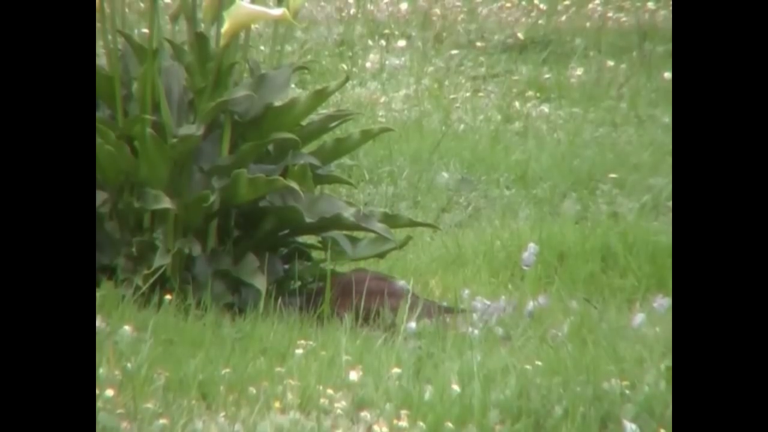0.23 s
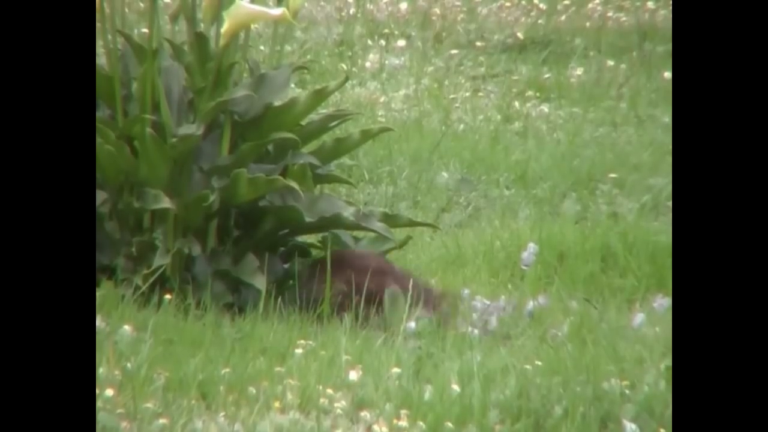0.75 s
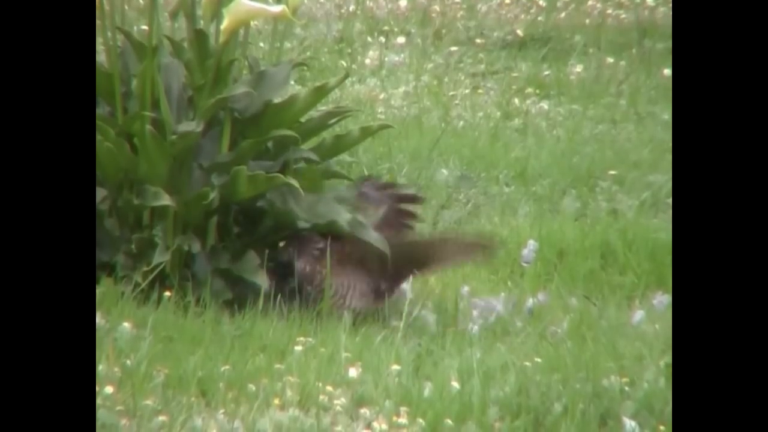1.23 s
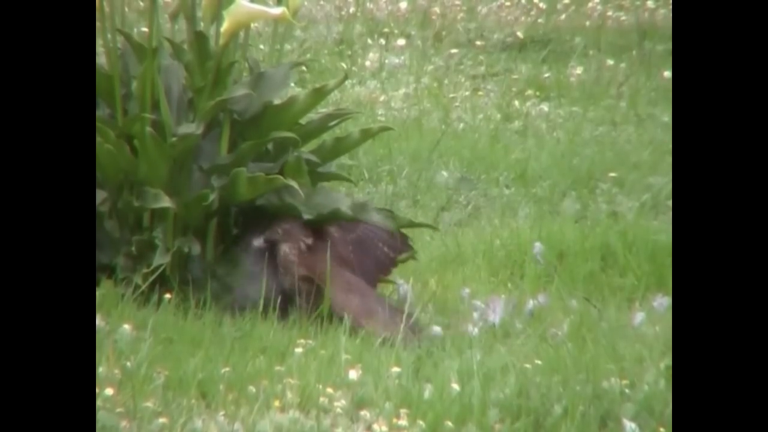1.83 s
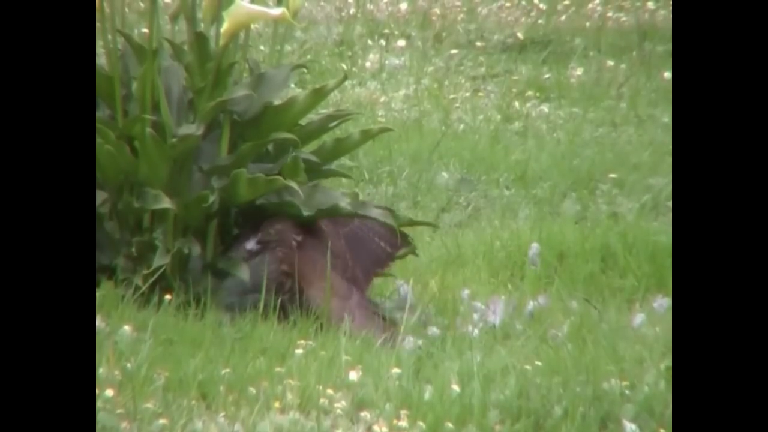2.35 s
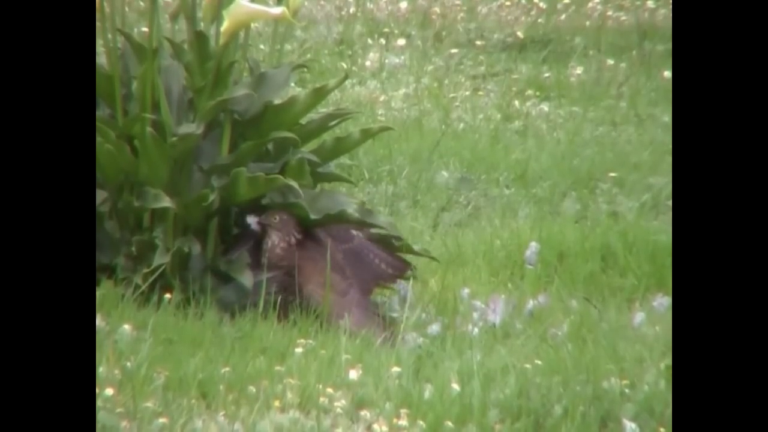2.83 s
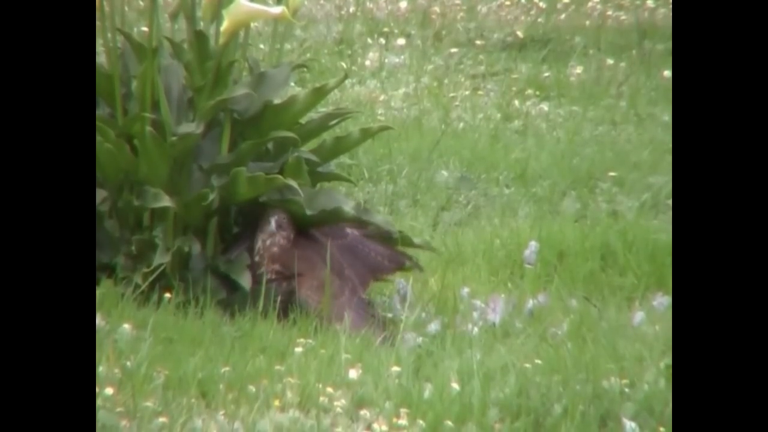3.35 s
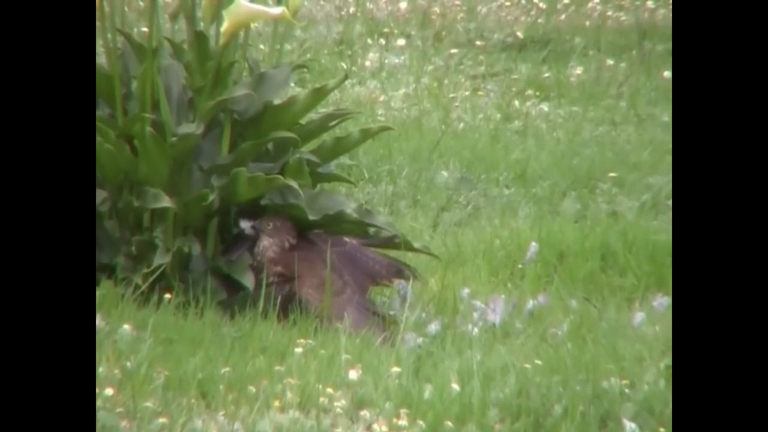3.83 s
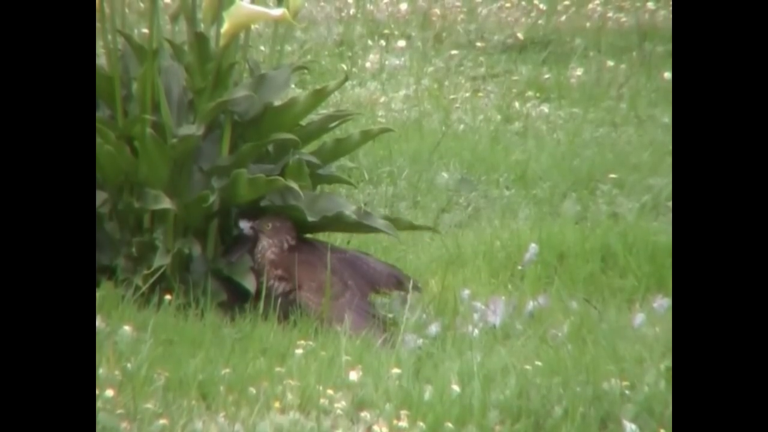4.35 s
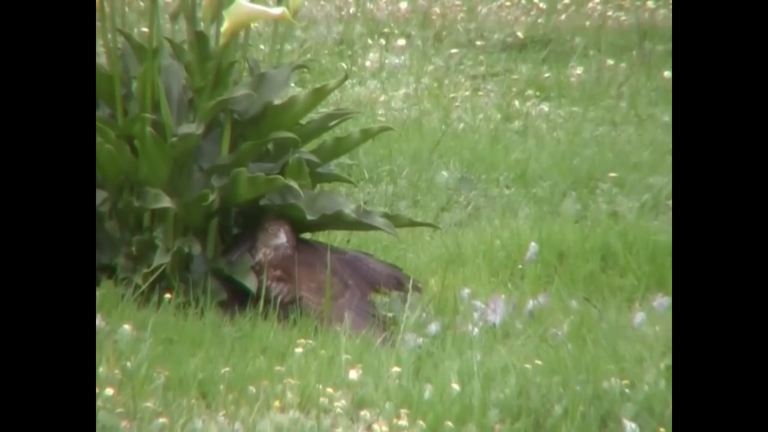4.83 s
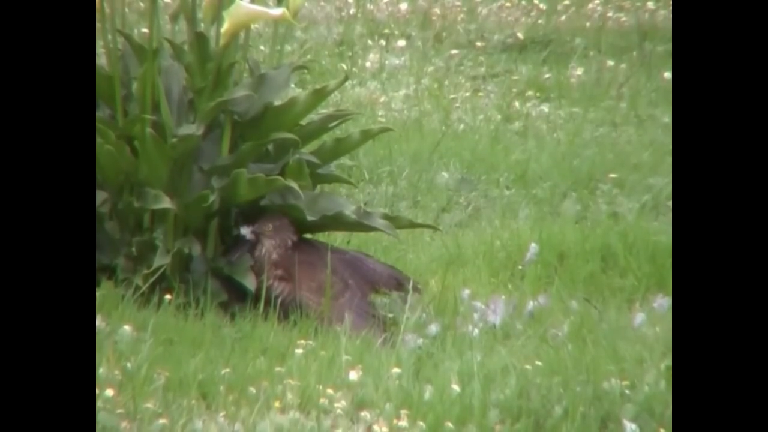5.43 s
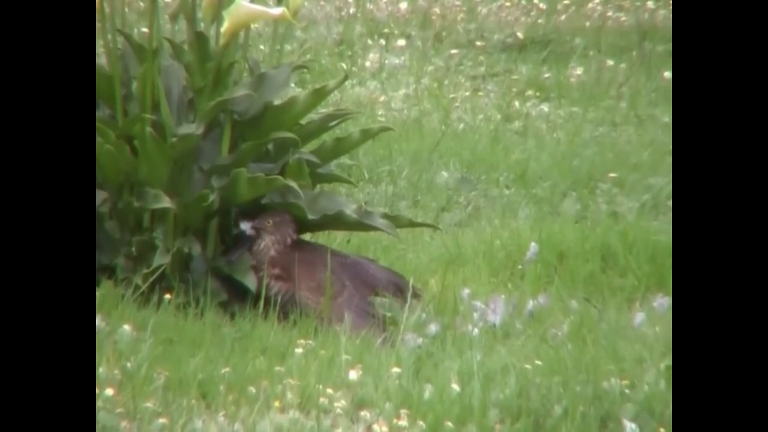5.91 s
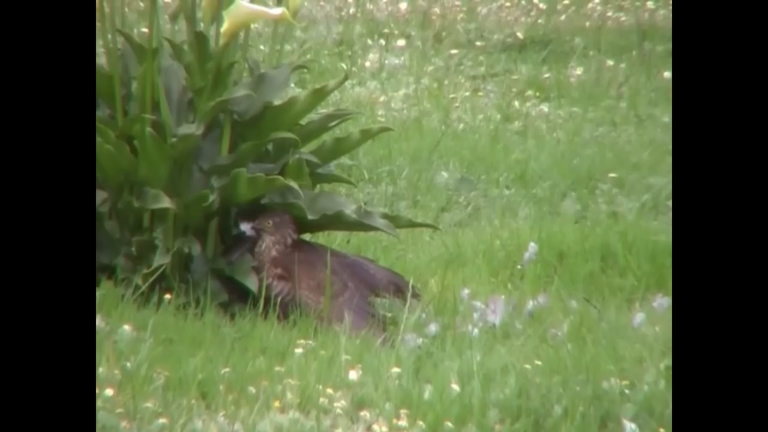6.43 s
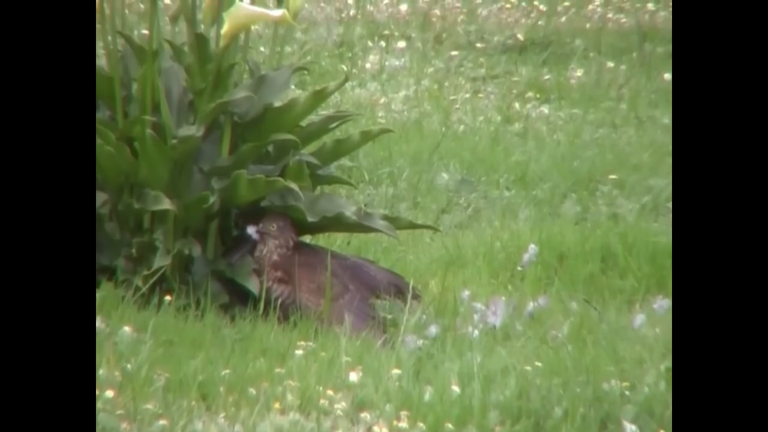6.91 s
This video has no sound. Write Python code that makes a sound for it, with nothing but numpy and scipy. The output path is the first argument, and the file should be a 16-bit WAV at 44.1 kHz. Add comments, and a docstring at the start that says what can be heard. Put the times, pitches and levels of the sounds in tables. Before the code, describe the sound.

Outdoors on a quiet lawn, a few dry stem snaps and faint distant bird whistles come first. Wing strokes then thump and scrape through rustling leaves and dry grass. A bird squeals shrilly, breaking into hoarse screeches with low squawks beneath. A sudden hard burst of flapping and cracking follows, then a few weaker cries. Close stereo microphones, light garden echo.

```python
"""On a lawn, close to a leafy plant, a hawk holds a pigeon down; small birds whistle and coo far off.
Stems snap first, then wing strokes push air and scrape feathers while leaves and dry grass rustle.
From 3.4 s a bird squeals and squawks: pairs of syrinx notes, each an arch of pitch, level and roughness.
A hard burst of flaps follows at 5.6 s, then a few last cries. Garden echoes and a short tail answer,
over faint wide air; two close microphones hear the bass alike."""
import sys
import numpy as np
from scipy import signal
from scipy.fft import rfft, irfft
from scipy.io import wavfile

SR = 44100
rng = np.random.default_rng(int(sys.argv[2]) if len(sys.argv) > 2 else 0)


def wav_out(sig):
    """Save sig, one row per channel (or a flat mono array), as 16-bit PCM at SR to the path in sys.argv[1]."""
    wavfile.write(sys.argv[1], SR, np.round(np.clip(np.atleast_2d(sig).T, -1, 1) * 32767).astype(np.int16))


N = 316638
TIME = np.arange(N) / SR

# Whistled notes; the two sides of the syrinx may overlap: (crest time [s], swell [s], fade [s],
# crest pitch [Hz], start and end against the crest [semitones], relative level [dB],
# roughness [0-1], second harmonic before the throat's colour [dB])
SQUEAL_NOTES = [ (3.407, 0.02, .026, 2724, -0.5, -1.5, -20, 0.35, -4.5),
                (3.458, .032, 0.048, 2906, -.3, -7, -16.5, 0.14, -5),
                (3.436, 0.017, .024, 3660, -3.5, 1.5, -21, 0.47, -11),
                (3.628, 0.012, 0.016, 2407, -1.4, 1, -25.5, 0.13, -11),
                (3.671, 0.029, 0.033, 3110, 3, 2, -25, 0.17, -3.5),
                (3.703, 0.027, .018, 4510, -0.5, 3.5, -38, 0.22, -15),
                (3.739, 0.029, 0.039, 3370, 0.5, -3.5, -28.5, 0.14, -4.5),
                (3.849, 0.014, 0.029, 2304, -0.6, 0.4, -31.5, 0.26, -18),
                (3.861, 0.028, 0.027, 3160, 1.3, 3, -29, 0.47, -26),
                (3.892, 0.021, 0.014, 3010, 3, 1.6, -24.5, .1, -17),
                (3.913, 0.023, 0.034, 4610, -0.2, -1, -36.5, 0.63, -28),
                (3.953, 0.041, 0.047, 3075, 2.2, -1.7, -31, 0.17, -10),
                (4.128, 0.045, 0.045, 2328, -0.3, 0, -27, 0.23, -5.5),
                (4.174, 0.019, 0.013, 2133, 1.5, -3, -26, 0.15, -4),
                (4.204, .042, .042, 4063, -2.2, -2, -18.5, .72, -15),
                (4.2256, 0.0092, 0.0072, 4010, .3, -.4, -6, 0.018, -17.5),
                (4.351, 0.015, .011, 3420, 0.6, 0, -20.5, 0.4, -5),
                (4.388, .04, 0.04, 4144, -.5, -2, -15.5, 0.81, -12.5),
                (4.433, 0.035, 0.045, 3580, -1, 0.2, -25, 0.44, -2),
                (4.749, 0.033, 0.019, 3386, -2, 4, -35.5, 0.85, -25),
                (4.772, 0.022, 0.015, 4590, 1, -3, -24.5, .15, -29),
                (4.785, 0.022, 0.021, 3724, 0.5, 0.7, -20.5, 0.1, -15),
                (4.815, 0.028, 0.027, 4510, 0.2, -1.5, -22.5, 0.096, -38),
                (4.828, 0.021, 0.056, 3814, -1, -2, -24, 0.2, -12),
                (5.015, 0.02, 0.02, 2990, 2, 2, -36.5, 0.06, -5),
                (5.03, 0.056, 0.045, 4610, -3.5, 1, -46.5, 0.13, -27),
                (5.115, 0.039, .03, 3566, 9, -7.5, -37.5, 0.17, -16),
                (5.357, 0.023, .058, 3205, .6, -0.1, -28, 0.38, -21),
                (5.474, 0.034, 0.051, 2370, 0.2, -1.4, -34.5, 0.25, -4.5),
                (5.524, .012, .014, 1914, .6, -1.5, -45, 0.23, -16),
                (5.581, .022, 0.027, 3370, -1, 4, -32, 0.47, -28),
                (5.59, 0.048, 0.033, 2378, -0.5, 0.5, -34, 0.46, -4),
                (6.706, 0.019, 0.038, 3670, -2, -3, -55, 0.17, -20),
                (6.684, 0.02, 0.084, 2386, -0.8, -3, -46, 0.14, -6),
                (6.797, 0.053, 0.037, 3390, 0.8, -1, -34, 0.098, -4),
                (6.823, .013, .036, 2586, 0.5, -1, -28.5, .07, -11.5),
                (6.875, 0.039, 0.047, 2358, 1.4, -4, -31, 0.22, -3.5),
                (7.043, 0.034, 0.019, 3060, 2, -1, -47.5, 0.13, -10.5)]
# Low-register notes: the same columns without the second harmonic
SQUAWK_NOTES = [ (3.843, 0.025, .012, 673, 0.6, -0.21, -34.5, 0.13),
                (4.2, 0.027, 0.029, 740, -0.5, -.6, -28, 0.51),
                (4.242, 0.015, 0.054, 739, 0.9, -1.49, -20, .18),
                (4.291, .018, .032, 593.5, 1.5, -.9, -19, .06),
                (4.385, .032, 0.034, 708, 0.5, 0.34, -28, 0.93),
                (4.444, 0.044, .046, 670.6, 0.6, -1.97, -26.5, 0.297),
                (4.872, .03, 0.0228, 475.6, 2.5, -0.91, -29, 0.91),
                (5.478, .03, 0.047, 1155, 1.9, -1, -46, 0.254),
                (6.707, 0.034, 0.05, 1190, -0.3, -1.6, -65, 0.13),
                (6.862, 0.046, 0.037, 1225, 0.4, -1.4, -33, 0.073)]
# Throat colour on the whistles' overtones: (frequency [Hz], level [dB])
OVERTONE_COLOUR = [(2000, -3), (5000, 2.5), (6500, -4), (8200, 5), (9800, 5.5), (11500, -2.5), (13000, 4)]
# Throat colour on the squawks: (frequency [Hz], level [dB])
THROAT_COLOUR = [(450, -7.5), (720, -1.5), (1400, -1), (2000, -8.5), (2900, 6), (3500, -1.5), (4600, 3),
                 (6000, -7.5), (8000, -9), (12000, -21)]
# Colour of the hoarse hiss: (frequency [Hz], density [dB per Hz])
HOARSE_COLOUR = [(60, -80), (400, -25), (900, -2), (2000, -14), (3200, -5), (4800, 10), (6500, 3),
                 (9000, -6), (12500, -16)]
# The voice leans as the bird is wrestled about: (time [s], left minus right [dB])
VOICE_LEAN = [(3.4, 0), (4.25, 2.5), (4.8, -1.5), (5.5, -0.5), (6.8, 2.5)]
HOARSE_DB = -7.5  # hiss of a fully rough note, against its level


def voice():
    """High squeals that break into hoarse screeches, with low squawks under them."""
    out, strain = np.zeros((2, N)), np.zeros((1, N))
    for s, swell, fade, crest_hz, start, end, db, rough, second_db in SQUEAL_NOTES:
        hz, arch = note(swell, fade, crest_hz, start, end)
        k = np.arange(1, 6)[:, None]  # harmonic numbers
        overtones_db = second_db - 8 * (k - 2) + read(OVERTONE_COLOUR, k * hz)
        levels_db = (k > 1) * overtones_db  # the fundamental stays at 0 dB
        tone = syrinx(hz, rough, levels_db, jitter=0.0954, jitter_hz=600, rasp=0.56, rasp_hz=1285)
        add(out, s - swell, amp(db) * arch * tone)
        add(strain, s - swell, amp(db) * rough * arch[None])
    for s, swell, fade, crest_hz, start, end, db, rough in SQUAWK_NOTES:
        hz, arch = note(swell, fade, crest_hz, start, end)
        k = np.arange(1, 21)[:, None]
        levels_db = read(THROAT_COLOUR, k * hz)
        tone = syrinx(hz, rough, levels_db, jitter=0.081, jitter_hz=390, rasp=0.62, rasp_hz=223)
        add(out, s - swell, amp(db) * arch * tone)
    hiss = amp(HOARSE_DB) * colour(strain * pair(N, likeness=0.088), HOARSE_COLOUR)
    lean_db = np.interp(TIME, *np.transpose(VOICE_LEAN))
    return (out + hiss) * amp(np.array([lean_db, -lean_db]) / 2)


NOTE_EDGE_DB, NOTE_ARCH = -12, 1.22  # level at a note's ends; power of the level arch
GLIDE_BEND, NOTE_TAPER = 1.3, 0.15  # power of the pitch arch; share of the note faded in and out
WARBLE_HZ, WARBLE_SEMITONES, WARBLE_DB = 27.23, 0.3, 2  # the voice shakes with the effort


def note(swell, fade, crest_hz, start_semitones, end_semitones):
    """One arch of effort: pitch glides to the crest and away as level swells and fades; both warble."""
    t = np.arange(-swell, fade, 1 / SR)
    away = np.where(t < 0, -t / swell, t / fade)  # 0 at the crest, 1 at the ends
    warble = np.sin(2 * np.pi * (WARBLE_HZ * t + rng.random()))
    glide = np.where(t < 0, start_semitones, end_semitones) * away ** GLIDE_BEND
    hz = crest_hz * np.exp2((glide + WARBLE_SEMITONES * warble) / 12)
    level = amp(NOTE_EDGE_DB * away ** NOTE_ARCH + WARBLE_DB * warble)
    return hz, level * signal.windows.tukey(len(t), NOTE_TAPER)


# Phase between the microphones: (frequency [Hz], lead of the left [rad])
LEFT_LEAD = [(700, 0.483), (2200, 1.27), (3200, 2), (4200, 1.14), (7500, 0.75), (12000, 0.1)]


def syrinx(hz, rough, levels_db, jitter, jitter_hz, rasp, rasp_hz,
           quaver=0.01214, flutter_db=2, scatter_rad=0.86):
    """A membrane's harmonics quaver with the strain; roughness shakes their pitch and their swing."""
    size = len(hz)
    shake = quaver * wander(size, hz=131) + jitter * rough * wander(size, jitter_hz)
    phase = 2 * np.pi * np.cumsum(hz * (1 + shake)) / SR
    weights = amp(levels_db) / np.sqrt(np.sum(amp(levels_db) ** 2, 0))
    out = np.zeros((2, size))
    for k, weight in enumerate(weights, 1):
        swing = 1 + rasp * rough * (wander(size, rasp_hz) + 1j * wander(size, rasp_hz))
        swing /= np.sqrt(0.5 + (rasp * rough) ** 2)
        turn = np.exp(1j * (k * phase + 2 * np.pi * rng.random()))  # the throat delays each differently
        wave = weight * (k * hz < SR / 2) * swing * turn
        # leaves scatter each harmonic on its way
        lag = read(LEFT_LEAD, k * hz) + scatter_rad * rng.standard_normal()
        out += np.real([wave, wave * np.exp(-1j * lag)])
    flutter = unit(amp(flutter_db * wander(size, hz=149)))
    return out * flutter * signal.windows.tukey(size, 0.06)


# Wing strokes: (peak time [s], relative air level [dB], relative feather level [dB], rise [s])
WING_STROKES = [ (1.181, -53.5, -70, 0.0045), (1.247, -50, -72, 0.022), (1.658, -57, -52, 0.0073),
                (2.328, -57, -41.5, .005), (2.474, -49, -35.5, .002), (2.531, -44, -38, 0.0059),
                (2.6682, -31, -37, 0.0013), (2.844, -40, -39.5, 0.023), (2.971, -38, -41.5, .0035),
                (3.609, -42.5, -64.5, 0.0071), (3.78, -44.5, -50, 0.0076), (4.001, -41.5, -52, 0.014),
                (4.728, -44, -70, 0.015), (4.949, -45, -75, 0.0096), (5.142, -40, -67, 0.0049),
                (5.611, -25.5, -40, 0.0011), (5.635, -21, -21.5, 0.011), (5.654, -24.5, -39, 0.0072),
                (5.755, -43, -41.5, 0.022), (5.81, -35, -34, .002), (5.893, -26.5, -26, 0.0014),
                (6.011, -33, -32, 0.016), (6.067, -33.5, -45, 0.0016), (6.091, -45, -37, .0047),
                (6.226, -30.5, -32.5, 0.0084), (6.316, -37.5, -46.5, 0.0033), (6.35, -32, -45, 0.007),
                (6.366, -36.5, -52, 0.0041), (6.472, -39, -52, 0.0035), (6.487, -36.5, -29, 0.0013),
                (6.602, -56, -41, .0033), (6.804, -34.5, -35.5, 0.003), (6.964, -58, -41, .019),
                (7.101, -44, -54.5, 0.0012)]
# Colour of the pushed air, also the body of a snap: (frequency [Hz], density [dB per Hz])
AIR_COLOUR = [(35, -52), (110, -17.5), (200, -3), (450, 1.5), (750, 3.5), (1300, 1.5), (2200, -2.5),
              (4000, -10.5), (8000, -26.5)]
# The broad wing's dull note: (frequency [Hz], density [dB per Hz])
WHUMP_COLOUR = [(40, -60), (150, -32), (400, -11.5), (700, 3), (1200, -4), (2200, -20), (5000, -56)]
# Colour of scraping feathers: (frequency [Hz], density [dB per Hz])
FEATHER_COLOUR = [(50, -17), (300, -11.5), (1500, -3), (3500, -2.5), (5500, -3.5), (8000, -3), (11000, 2.5),
                  (13000, -9)]
# Low thud of hard strokes: (frequency [Hz], density [dB per Hz])
THUD_COLOUR = [(25, -26), (90, -14), (200, 10), (500, -20)]
AIR_FALL_S, FEATHER_FALL_S, WHUMP_FALL_S = 0.019, 0.017, 0.025  # decay times of a stroke's parts


def wings(thud_db=-7, whump_db=-6, puff_db=-1.5, pan_db=-1.7):
    """Each stroke pushes a puff of air that dulls to a whump, while the feathers scrape each other."""
    air, push, scrape = np.zeros((3, 1, N))
    t = np.arange(-SR // 10, SR // 4) / SR
    for s, air_db, feather_db, rise in WING_STROKES:
        add(air, s + t[0], amp(air_db) * surge(t, rise, AIR_FALL_S)[None])
        add(push, s + t[0], amp(air_db) * surge(t, rise, WHUMP_FALL_S)[None])
        add(scrape, s + t[0], amp(feather_db) * surge(t, rise, FEATHER_FALL_S)[None])
    puff_noise = pair(N, likeness=0.47) * unit(amp(2.9 * wander(N, hz=298)))
    whump_noise = pair(N, likeness=0.5) * unit(amp(4.6 * wander(N, hz=120)))
    barb_noise = pair(N, likeness=1.0) * unit(amp(2.9 * wander(N, hz=587)))
    puff = amp(puff_db) * colour(air * puff_noise, AIR_COLOUR)
    whump = amp(whump_db) * colour(push * whump_noise, WHUMP_COLOUR)
    barbs = colour(scrape * barb_noise, FEATHER_COLOUR)
    # the square lets hard strokes thud far more than soft ones
    thud = amp(thud_db) * colour(air ** 2 * rng.standard_normal(N), THUD_COLOUR)
    return (puff + whump + thud) * amp(np.array([[pan_db], [-pan_db]]) / 2) + barbs


# Stems and quills that snap: (time [s], relative level [dB], relative body against treble [dB])
STEM_SNAPS = [(.181, -36, -35), (0.378, -25, -27), (.385, -29, -39), (0.5995, -23.5, -10),
              (1.165, -37, -14), (1.385, -41, -24), (1.745, -29.5, -14), (1.848, -40, -34),
              (2.471, -20, -6), (2.511, -19, -35), (2.643, -18.5, -14), (2.685, -18, -26),
              (3.321, -22.5, -22), (5.631, -10, -13), (5.891, -14.5, -4), (6.217, -30, -8),
              (6.479, -19, -25), (6.489, -17, -19), (6.494, -15.5, -15)]
# Treble colour of a snap: (frequency [Hz], density [dB per Hz])
SNAP_COLOUR = [(50, -45), (200, -42), (1000, 0), (3000, 5.5), (5500, 7), (7800, 15), (11000, 17),
               (13000, -24)]


def snaps(crack_s=0.00071, crumble_s=0.024, crumble_db=-20, level_db=-5):
    """A stem gives with one sharp crack and a brief crumble of fibres."""
    out, t = np.zeros((2, N)), np.arange(-SR // 200, SR // 20) / SR
    crumble = amp(crumble_db) * np.exp(-abs(t) / crumble_s)
    shape = (t >= 0) * (np.exp(-abs(t) / crack_s) + crumble)
    for s, db, body_db in STEM_SNAPS:
        burst = unit(pair(len(t), likeness=1.0) * shape) * np.sqrt(np.mean(shape ** 2))
        body = amp(body_db - 2) * colour(burst, AIR_COLOUR)
        add(out, s + t[0], amp(db + level_db) * (colour(burst, SNAP_COLOUR) + body))
    return out


def zip_of_feather(s=2.51, length=0.038, hz=10400, width_hz=650, db=-33):
    """A feather drags fast over a leaf edge; its barbs make a thin, high zip."""
    out, size = np.zeros((2, N)), int(length * SR)
    drift = wander(size, width_hz) + 1j * wander(size, width_hz)
    band = unit(np.real(drift * np.exp(2j * np.pi * hz * TIME[:size])))
    add(out, s, amp(db) * (band * signal.windows.tukey(size, 0.2))[None])
    return out


# Bouts of shoving in the plant, each swelling and settling: (peak time [s],
# relative leaf level [dB], relative dry grass level [dB], rise [s], fall [s])
SHOVES = [(1.24, -62, -68, .08, .7), (2.45, -42, -40.5, .24, 1.0), (3.7, -48.5, -55, 0.6, 0.53),
          (4.9, -54.5, -53, 0.6, 1), (5.75, -44.5, -48.5, 0.2, 0.41), (6.95, -63, -61, 0.21, .4)]
# Colour of broad leaves: (frequency [Hz], density [dB per Hz])
LEAF_COLOUR = [(35, -60), (90, -31), (140, -17.5), (200, -1), (400, 1.5), (750, 1.5), (1500, -0.5),
               (2500, -5.5), (4500, -7), (7000, -36), (12000, -16)]
# Colour of dry blades: (frequency [Hz], density [dB per Hz])
GRASS_COLOUR = [(1000, -62), (3000, -9), (5500, -2.5), (7800, 4.5), (10500, 5.5), (13000, -2.5)]


def rustle(swish_db=-1.46, pat_db=-7, fizz_db=0, crackle_db=-8):
    """Broad leaves swish and pat against each other; dry blades fizz and crackle."""
    leaves = np.sqrt(sum((amp(db) * surge(TIME - s, rise, fall)) ** 2 for s, db, _, rise, fall in SHOVES))
    grass = np.sqrt(sum((amp(db) * surge(TIME - s, rise, fall)) ** 2 for s, _, db, rise, fall in SHOVES))
    swish_flicker = unit(amp(0.93 * wander(N, hz=50) + 1.2 * wander(N, hz=400)))
    fizz_flicker = unit(amp(2.1 * wander(N, hz=34.9) + 1.36 * wander(N, hz=900)))
    swish = amp(swish_db) * pair(N, likeness=0.45) * swish_flicker
    pats = amp(pat_db) * pair(N, likeness=0.86) * grains(per_s=30, spread_db=5.5, decay_s=0.0093)
    fizz = amp(fizz_db) * pair(N, likeness=1.0) * fizz_flicker
    crackle = amp(crackle_db) * pair(N, likeness=1.0) * grains(per_s=170, spread_db=4.0, decay_s=0.0014)
    return colour(leaves * (swish + pats), LEAF_COLOUR) + colour(grass * (fizz + crackle), GRASS_COLOUR)


# A far bird's two-note phrase: (delay [s], pitch [Hz], relative level [dB], length [s])
FAR_PHRASE = [(0, 3130, -62.5, .05), (0.041, 2892, -61, .075)]
# A far low call: (time [s], pitch [Hz], relative level [dB], length [s])
FAR_COO = (0.7, 639, -67.5, 0.2)
PHRASE_START_S, PHRASE_EVERY_S = 0.365, 0.125


def far_bird(flutter=0.022, sag=0.036, blur_hz=110, count=6):
    """Soft whistles that fall slightly, and one coo, blurred on their way across the garden."""
    out = np.zeros((2, N))
    starts = PHRASE_START_S + PHRASE_EVERY_S * np.arange(count)
    song = [(start + delay, *rest) for start in starts for delay, *rest in FAR_PHRASE]
    for s, hz, db, length in song + [FAR_COO]:
        u = np.linspace(0, 1, int(length * SR))
        bend = -sag * (u - 0.5) + flutter * wander(len(u), hz=220)
        phase = 2 * np.pi * np.cumsum(hz * (1 + bend)) / SR
        blur = unit(0.5 + wander(len(u), blur_hz) + 1j * wander(len(u), blur_hz))
        whistle = np.real(blur * np.exp(1j * np.array([phase, phase + 1])))  # right leads by 1 rad
        add(out, s, amp(db) * np.sin(np.pi * u) * whistle)
    return out


# Colour of still outdoor air: (frequency [Hz], density [dB per Hz])
CALM_COLOUR = [(24, -89), (40, -62), (222, -7), (492, -2.5), (724, -2), (2540, -7), (9820, -7),
               (12800, -11), (16600, -43), (22000, -120)]
# Width of the air: (frequency [Hz], side against mid [dB])
CALM_SPREAD = [(200, 14), (600, 8), (1500, 10.5), (4000, 3), (7000, -54)]
CALM_DB = -60.5  # level of the mid


def calm():
    """A faint, wide hush that wavers a little."""
    waver = unit(amp(2.3 * wander(N, hz=29.8)))
    mid, side = colour(rng.standard_normal((2, N)) * waver, CALM_COLOUR)
    side = irfft(rfft(side) * amp(read(CALM_SPREAD, np.fft.rfftfreq(N, 1 / SR))), N)
    return amp(CALM_DB) * np.array([mid + side, mid - side])


# Tail of the garden: (frequency [Hz], time to fall 60 dB [s])
GARDEN_T60 = [(200, 1), (1000, 0.59), (3500, 0.82), (7000, 0.46), (13000, 0.2)]


def garden(x, echo_db, tail_db):
    """A few near reflections, then a thin tail from plants and fences."""
    size = SR * 2 // 3
    t_echo = TIME[:size]
    taps = rng.standard_normal((2, size)) * (rng.random((2, size)) < 3000 / SR) * (t_echo > 0.012)
    hz, t, z = signal.stft(taps, SR, nperseg=256)
    decay = amp(-60 * t / read(GARDEN_T60, hz)[:, None])
    tail = signal.istft(z * decay, SR, nperseg=256)[1][:, :size]
    echoes = rng.choice([-1, 1], (2, size)) * (rng.random((2, size)) < 600 / SR)
    echoes = echoes * (t_echo > 0.003) * np.exp(-t_echo / 0.017)
    response = (amp(tail_db) * unit(tail) + amp(echo_db) * unit(echoes)) / np.sqrt(size)
    return x + signal.oaconvolve(x, response, axes=1)[:, :N]


def surge(t, rise, fall):
    """A smooth swell up to t = 0, then an exponential decay."""
    return np.exp(-(np.minimum(t, 0) / rise) ** 2 - np.maximum(t, 0) / fall)


def grains(per_s, spread_db, decay_s):
    """Level of a random train of short grains, a few much larger than the rest."""
    sizes = amp(spread_db * np.minimum(rng.exponential(1, N), 3.5))
    ticks = (rng.random(N) < per_s / SR) * sizes
    return unit(signal.lfilter([1], [1, -np.exp(-1 / (decay_s * SR))], ticks))


def pair(size, likeness):
    """White noise at two microphones, partly shared."""
    shared = np.clip(likeness, 0, 1)
    own = np.sqrt(1 - shared) * rng.standard_normal((2, size))
    return np.sqrt(shared) * rng.standard_normal(size) + own


def wander(size, hz):
    """Smooth chance of rms about 1, its spectrum a Gaussian that dies away above hz."""
    padded = size + SR // 4
    f = np.fft.rfftfreq(padded, 1 / SR)
    return unit(irfft(rfft(rng.standard_normal(padded)) * np.exp(-(f / hz) ** 2)))[:size]


def colour(x, spectrum):
    """Filters x by a spectrum, keeping the power of white noise."""
    size = x.shape[-1]
    return irfft(rfft(x) * unit(amp(read(spectrum, np.fft.rfftfreq(size, 1 / SR)))), size)


def read(points, hz):
    """A table's value on a log-frequency axis."""
    f, value = np.transpose(points)
    return np.interp(np.log(hz + 1), np.log(f + 1), value)


def add(mix, s, sound):
    """Mixes a sound in at time s, cut at the end of the mix."""
    part = mix[:, max(round(s * SR), 0):][:, :sound.shape[1]]
    part += sound[:, :part.shape[1]]


def amp(db):
    """Decibels to amplitude."""
    return 10 ** (np.asarray(db) / 20)


def unit(x):
    """Scales x to an rms of 1."""
    return x / np.sqrt(np.mean(np.abs(x) ** 2) + 1e-20)


def scene():
    """The cries and the struggle echo in the garden, over the rustle, far birds and calm air."""
    calls = amp(-1.0) * garden(voice(), echo_db=-2.0, tail_db=-18.5)
    struggle = garden(wings() + snaps() + zip_of_feather(), echo_db=-13.5, tail_db=-13.5)
    far = garden(far_bird(), echo_db=2, tail_db=-6)
    return calls + struggle + rustle() + calm() + far


EDGE_HZ = 12950  # upper band limit


def record(dry, alike_hz=260, width=0.69):
    """Two close microphones hear the bass alike; then a steep low-pass limits the band."""
    mid, side = (dry[0] + dry[1]) / 2, (dry[0] - dry[1]) / 2
    bass_cut = signal.butter(2, alike_hz, "high", fs=SR, output="sos")
    side = width * signal.sosfilt(bass_cut, side)
    low_pass = signal.firwin(301, EDGE_HZ, window=("kaiser", 8), fs=SR)
    return signal.oaconvolve(np.array([mid + side, mid - side]), low_pass[None], "same")


dry = scene()
out = record(dry)
wav_out(out)
```